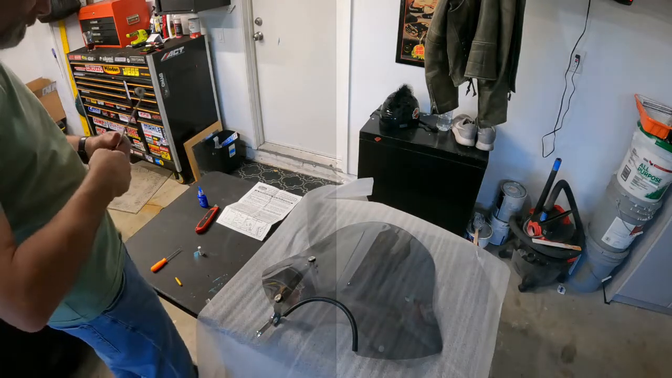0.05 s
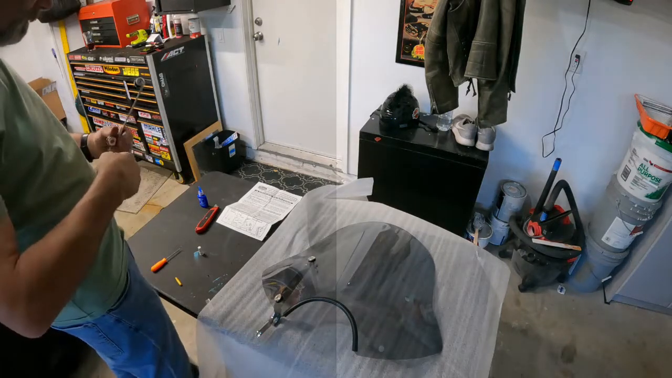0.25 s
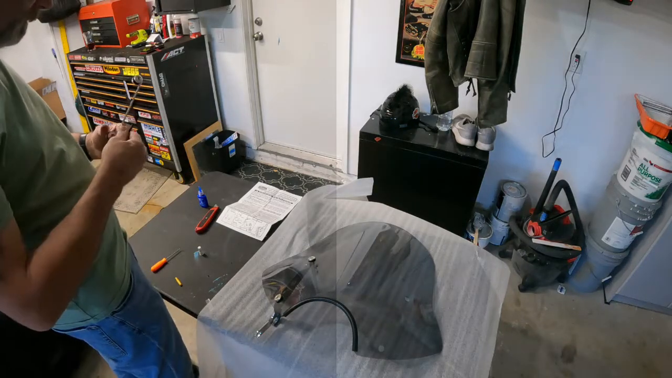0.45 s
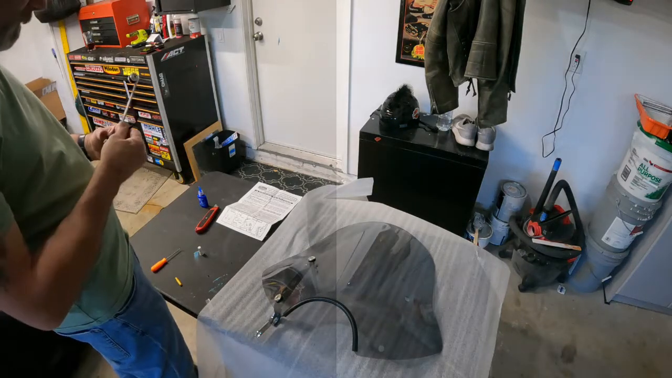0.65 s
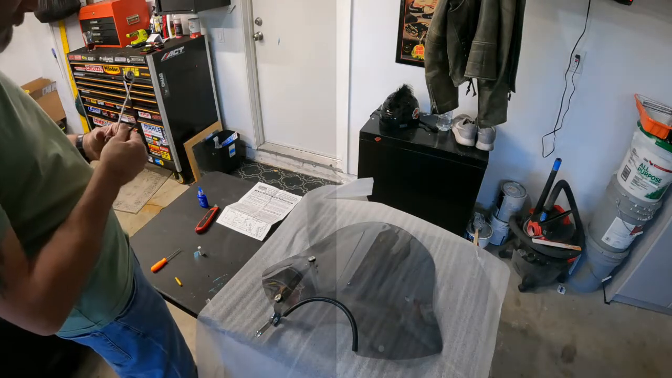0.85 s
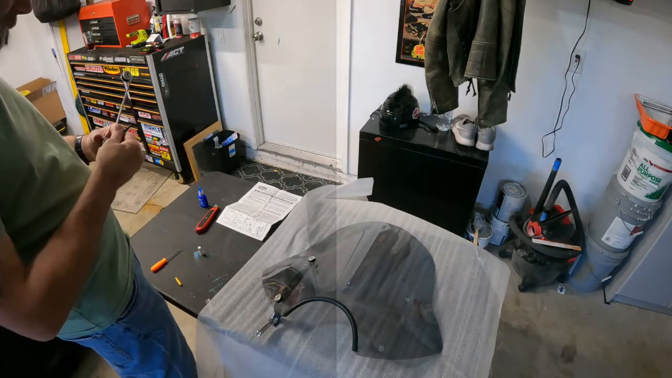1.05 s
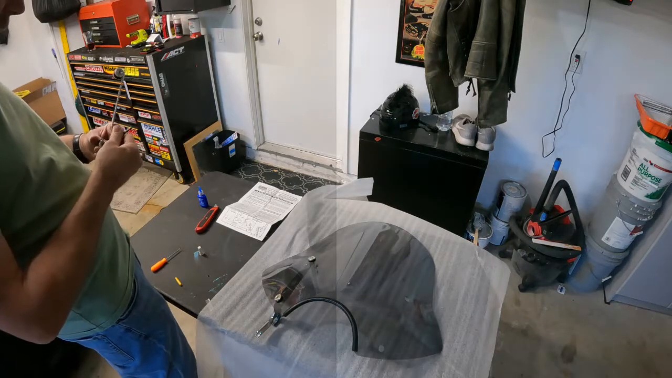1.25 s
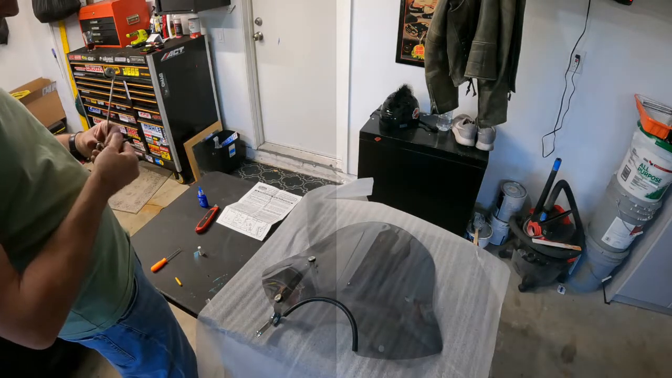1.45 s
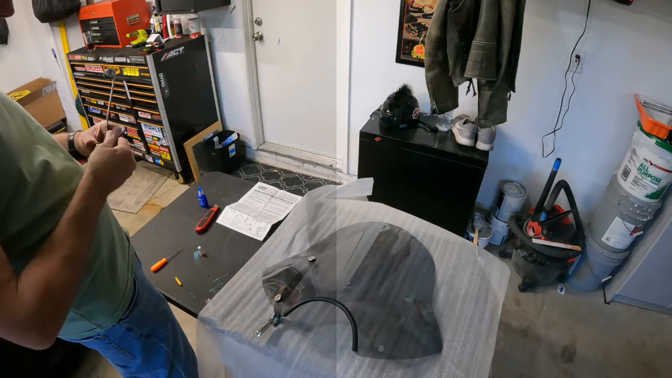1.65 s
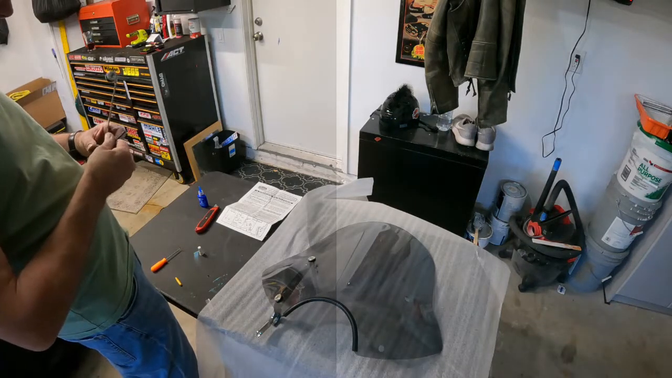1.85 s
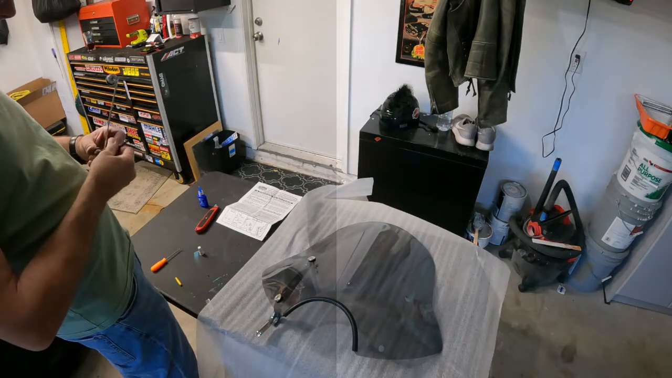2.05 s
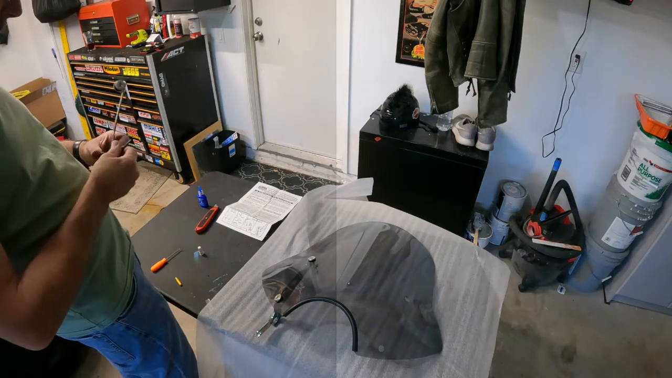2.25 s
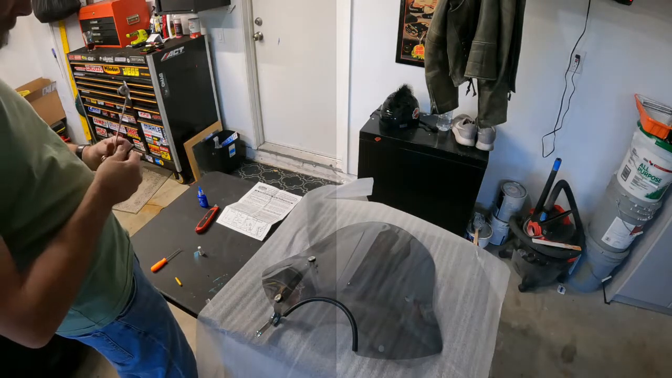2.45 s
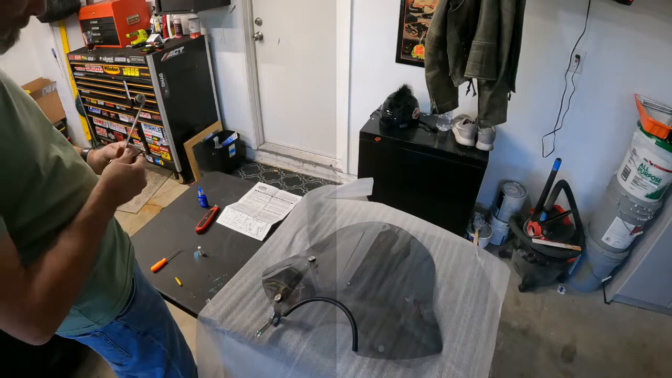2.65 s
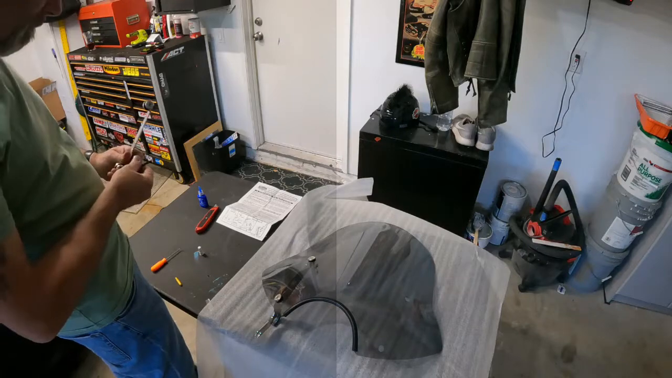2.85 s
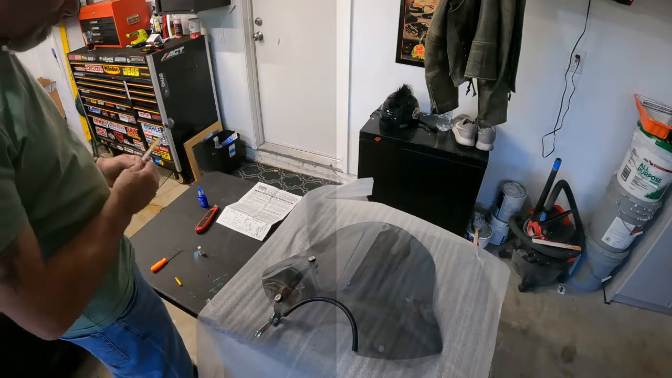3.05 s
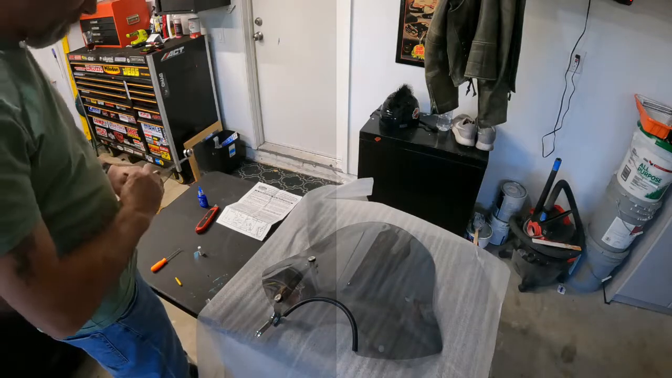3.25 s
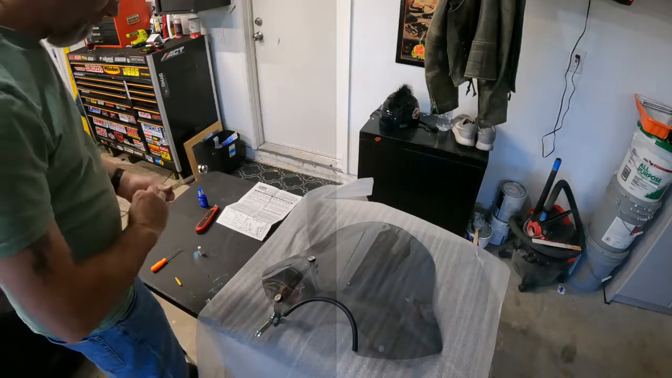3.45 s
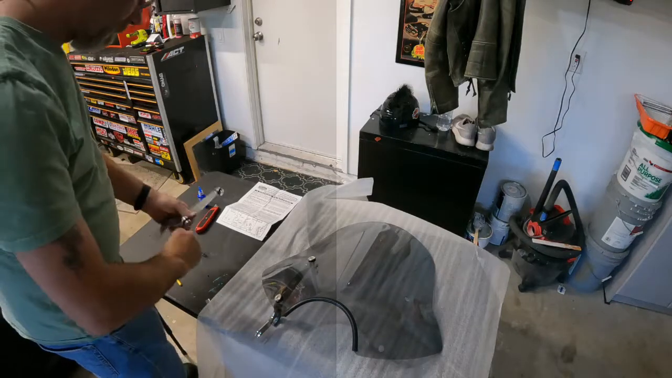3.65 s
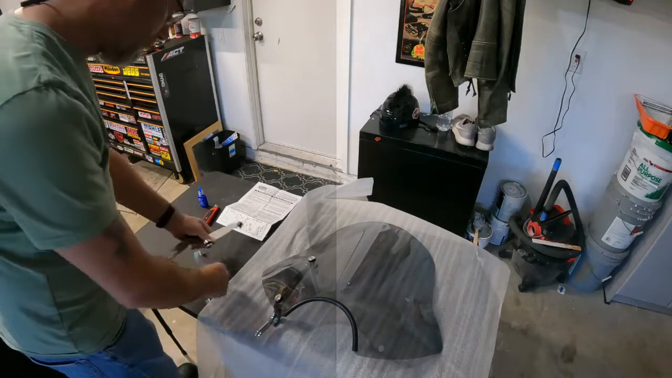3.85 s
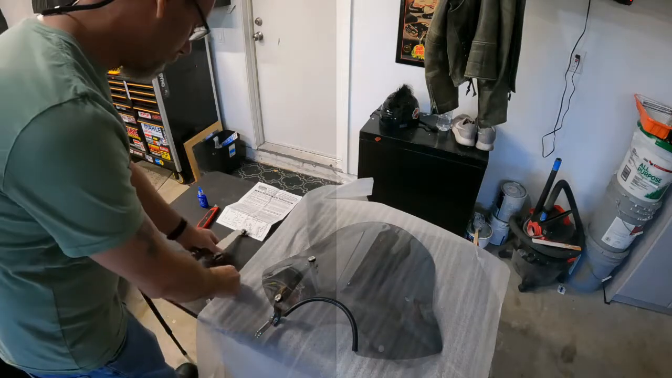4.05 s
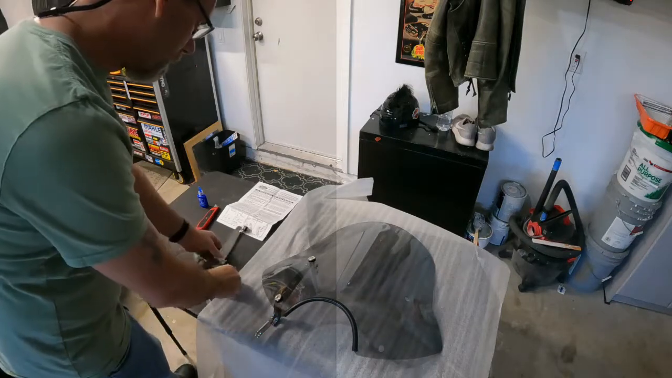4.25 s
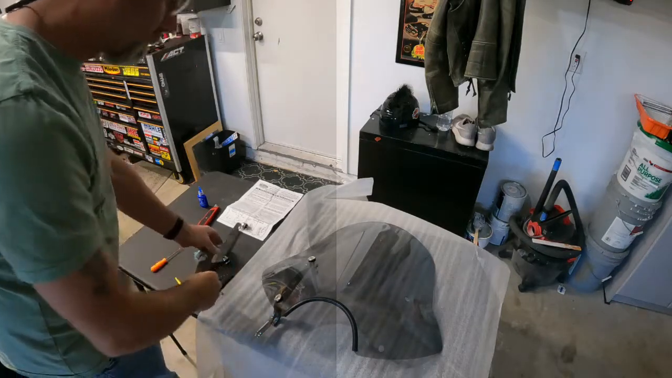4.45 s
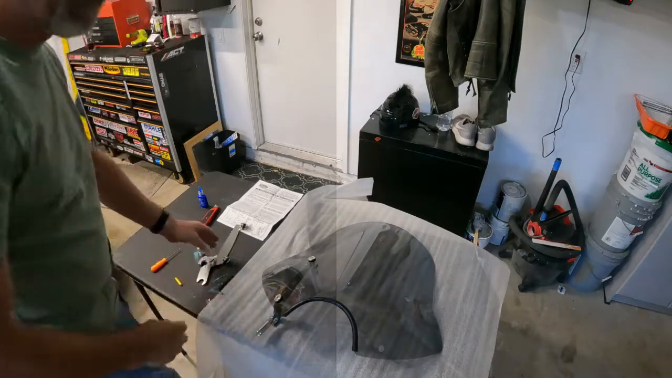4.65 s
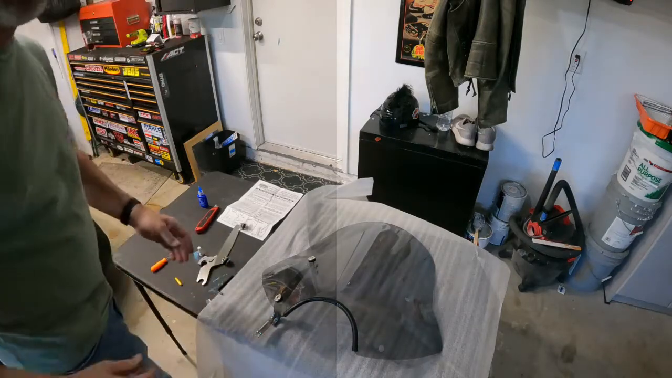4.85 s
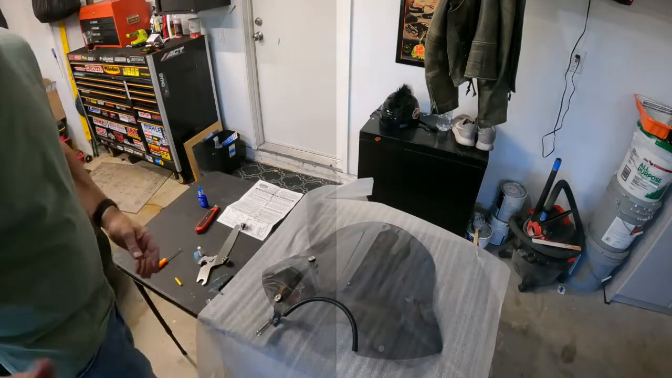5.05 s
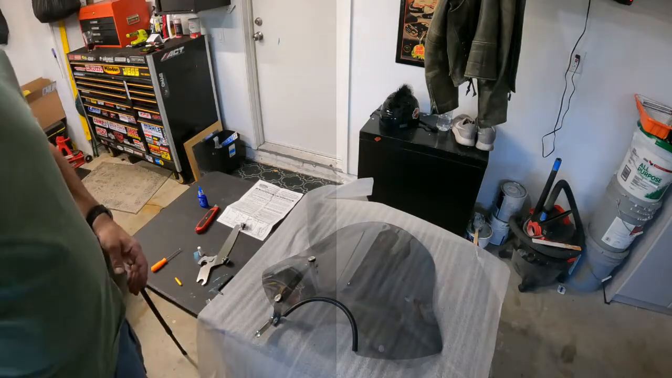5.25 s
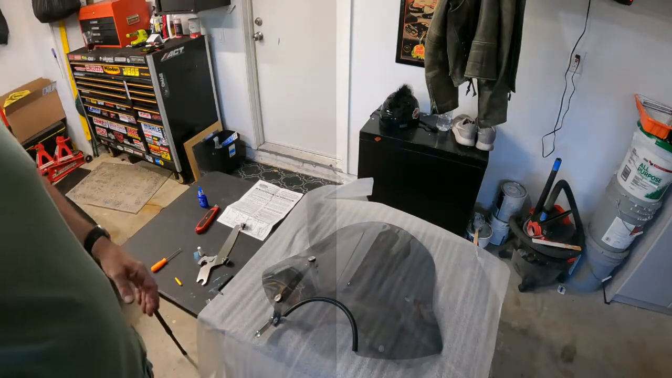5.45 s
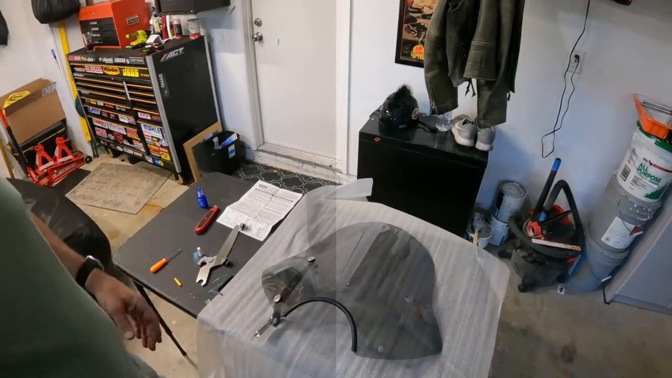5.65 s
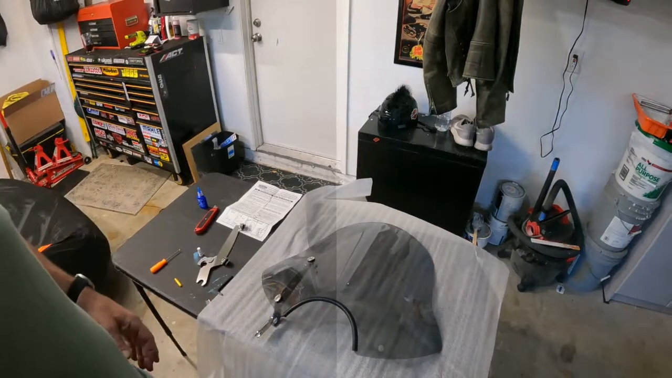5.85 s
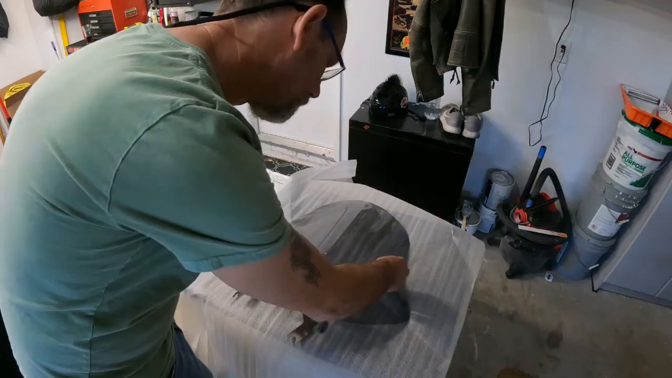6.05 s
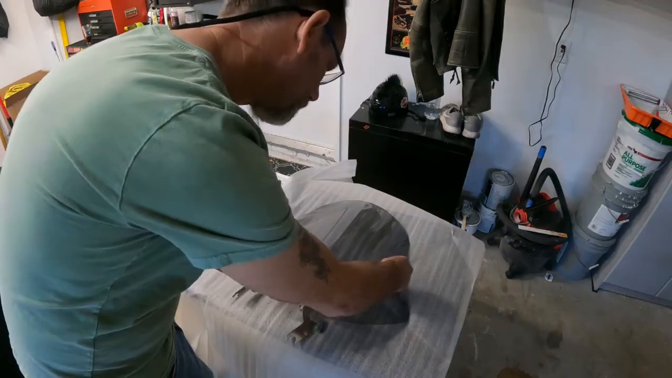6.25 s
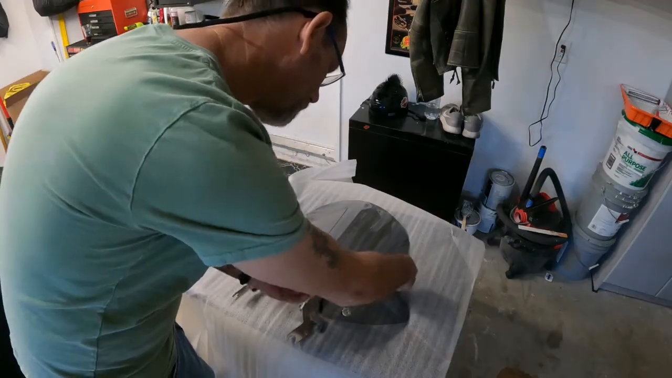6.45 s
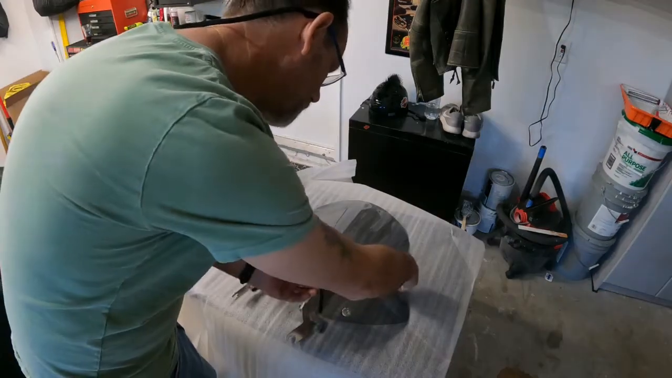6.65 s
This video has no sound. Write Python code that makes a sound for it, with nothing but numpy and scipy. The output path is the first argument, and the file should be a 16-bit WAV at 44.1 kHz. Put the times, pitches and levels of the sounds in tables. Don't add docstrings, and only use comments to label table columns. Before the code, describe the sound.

Quiet garage air, with hands working at arm's length from the microphone. Sleeves rub, tiny metal pieces tick and click sparsely, then more sharply. Around four seconds a steel wrench bounces and rattles on a hollow plastic tabletop, with boomy knocks and a short echo; a heavier part lands with a deep thud. Faint taps and cloth follow, then rough handling of the microphone, a tiny gap and calm room tone.

```python
import sys
import numpy as np
from scipy import signal
from scipy.io import wavfile
from scipy.ndimage import map_coordinates

SR = 44100
rng = np.random.default_rng(int(sys.argv[2]) if len(sys.argv) > 2 else 0)


def dump_mix(stems):
    frames = np.atleast_2d(stems).T
    limited = np.clip(frames, -1, 1)
    pcm = np.round(limited * 32767).astype(np.int16)
    wavfile.write(sys.argv[1], SR, pcm)


def gain_from_decibels(decibels):
    exponent = np.asarray(decibels, float) / 20
    return 10 ** exponent


N = 295469


def rms_one(x):
    return x / np.sqrt(np.mean(x ** 2) + 1e-20)


def in_time(rows, silent_db=-110):
    s, *columns = np.transpose(rows)
    t = np.arange(N) / SR
    return np.array([np.interp(t, s, c, left=silent_db, right=silent_db) for c in columns])


def at_hz(points, hz):
    table_hz, value = np.array(points).T
    return np.interp(np.log(hz), np.log(table_hz), value)


def cut(x, hz, kind, order=2):
    return signal.sosfilt(signal.butter(order, hz, kind, fs=SR, output="sos"), x + 1e-18)


def drift(rate):
    coarse = np.arange(0, N + 32, 32)
    slow = map_coordinates(rng.standard_normal(1500), [coarse * rate / SR], order=3)
    return np.interp(np.arange(N), coarse, slow)


def bands(size, gain, alike):
    out, edges = 0, 62.5 * 2 ** np.arange(0, 8.1, .5)
    white = rng.standard_normal((2, 2, size))
    for k, (low, high) in enumerate(zip(edges, edges[1:])):
        mid, side = cut(white[k % 2], [low, high], "band")
        hz = np.sqrt(low * high)
        c = np.clip(alike(hz), -1, 1)
        out = out + gain(hz) * (np.sqrt(1 + c) * mid + np.sqrt(1 - c) * side * [[1], [-1]])
    return out


def strike(modes, contact_s, spread_db, rough, detune=0.0054):
    hz, level_db, t60 = np.transpose(modes)[:, :, None]
    t = np.arange(min(SR // 3, 800 + int(t60.max() * SR))) / SR
    luck = rng.standard_normal((2, len(modes), 1))
    phase = 2 * np.pi * hz * (1 + detune * luck[1]) * t
    decay = gain_from_decibels(level_db + spread_db * luck[0] - 60 * t / t60)
    rings = np.sum(decay * np.sin(phase), axis=0)
    contact = (1 - rough + rough * rng.standard_normal(800)) * np.exp(-t[:800] / contact_s)
    out = signal.fftconvolve(rings, contact)[:len(t)]
    return np.pad(out / np.abs(out).max(), (0, SR // 3 - len(t)))


def add(track, s, sound):
    i = round(s * SR)
    track[..., i:i + sound.shape[-1]] += sound[..., :N - i]


def sides(lean_db):
    return gain_from_decibels(np.array([[.5], [-.5]]) * lean_db)


def swells(rows, rise_db_per_s, fall_db_per_s):
    t = np.arange(N) / SR
    levels = []
    for s, hold, level_db in rows:
        rise_db = rise_db_per_s * np.maximum(s - t, 0)
        fall_db = fall_db_per_s * np.maximum(t - s - hold, 0)
        levels.append(level_db - rise_db - fall_db)
    return np.array(levels)


# (frequency [Hz], level [dB per Hz])
AIR_SPECTRUM = [(35, -47), (60, -19.5), (123, -21.5), (162, 8), (224, -2), (251, -11), (381, -12),
                (551, -25.5), (1130, -20.5), (1830, -28), (2470, -33.5), (3750, -37), (7000, -35),
                (11400, -52), (15000, -64.5)]
# (time [s], level [dB])
AIR_LEVEL = [(0, -61), (.6, -64), (2, -62), (4, -62), (5.9, -65), (6.04, -66.5), (6.7, -63)]
# (frequency [Hz], left-right likeness [0-1])
AIR_ALIKE = [(60, 0.75), (180, 0.74), (550, 0.12), (1650, 0.15), (4970, 0.83), (15000, 0.76)]
# (frequency [Hz], left minus right [dB])
AIR_LEAN = [(60, -4), (180, -4), (550, -9), (1650, -0.5), (4970, 3), (15000, 2)]
# (start [s], end [s], frequency [Hz], level [dB])
FAR_DRONES = [
    (3.82, 4.17, 145, -60),
    (5.52, 5.72, 211, -60),
    (4.95, 5.2, 185, -62),
]


def room_tone():
    def flicker(hz):
        return gain_from_decibels(at_hz(AIR_SPECTRUM, hz) + 1.9 * drift(6.6)) * sides(at_hz(AIR_LEAN, hz))

    air = bands(N, flicker, lambda hz: at_hz(AIR_ALIKE, hz))
    air = air + 4.2 * cut(air, 140, "high", order=8)
    out = gain_from_decibels(in_time(AIR_LEVEL)[0]) * rms_one(air)
    t = np.arange(N) / SR
    for start, end, hz, level_db in FAR_DRONES:
        swell = np.clip(np.minimum(t - start, end - t) / 0.075, 0, 1)
        level = gain_from_decibels(level_db + 3 + 0.87 * drift(27))
        out += level * swell * np.sin(2 * np.pi * hz * t + .5 * drift(11))
    return out


# (frequency [Hz], level [dB per Hz])
CLOTH_SPECTRUM = [(200, -6), (370, -2), (700, -17.5), (1270, 3.5), (2400, -5), (4200, -3), (6500, -3),
                  (7800, -11.5), (8800, -18), (12000, -21), (15000, -30.5)]
# (start [s], hold [s], level [dB], brightness [dB])
STROKES = [(0.0, 0.048, -48.5, -1.5), (0.096, 0.036, -51, -3), (0.159, 0.048, -51.5, -2.5),
           (0.96, 0.024, -66.5, -15), (1.25, 0.12, -70.5, -2), (1.628, .03, -80.5, 6),
           (2.4, 0.036, -86.5, 5), (2.608, 0.029, -74.5, 5), (3.1, 0.093, -75, 10.5), (3.19, 0.046, -65, 2),
           (3.37, 0.46, -81, 7), (3.9, 0.52, -75, 3.5), (4.52, .04, -51.5, 1), (4.604, 0.043, -47.5, -9),
           (5.357, 0.17, -66, -1), (5.638, 0.078, -63.5, 2.5), (5.809, 0.056, -50, 8),
           (5.89, 0.067, -53, 5.5)]
# (start [s], end [s])
GAP = (6.0025, 6.0365)


def cloth():
    grain_db = 1.5 * np.minimum(rng.exponential(1, N // 40 + 1), 4)
    grain = gain_from_decibels(grain_db).repeat(40)[:N]
    rub = bands(N, lambda hz: gain_from_decibels(at_hz(CLOTH_SPECTRUM, hz)), lambda hz: .6) * grain
    strokes = np.array(STROKES)
    strokes_db = swells(strokes[:, :3], rise_db_per_s=183, fall_db_per_s=170)
    dark_db = strokes_db.max(axis=0)
    bright_db = (strokes_db + strokes[:, 3:]).max(axis=0)
    dark = rms_one(cut(rub, [130, 3000], "band", order=3))
    bright = rms_one(cut(rub, [3200, 7600], "band", order=3))
    hiss = rms_one(cut(cut(rub, 8500, "high"), 19000, "high", order=1))
    bright = bright + gain_from_decibels(-20.5) * hiss
    out = gain_from_decibels(dark_db) * dark * sides(1.2) + gain_from_decibels(bright_db) * bright * sides(4.5)
    return out * (np.arange(N) < GAP[0] * SR)


# (frequency [Hz], level [dB], t60 [s])
PART_MIDDLE = [(3300, -1.5, .004), (3800, 0, .005), (4600, -3, .003), (5500, -3.5, .004)]
# (frequency [Hz], level [dB], t60 [s])
PART_TOP = [(6200, -5, .003), (6800, 0, .006), (8000, -4, .003), (9200, -3, .006), (11300, -6, .004),
            (12500, -12, .003)]
# (time [s], peak [dB], main ring [Hz])
SETTLING = [
    (0.0274, -40, 1355),
    (0.1082, -35, 1704),
    (0.1745, -41.5, 1200),
    (0.2394, -44.5, 1840),
]
# (time [s], peak [dB], main ring [Hz], middle rings [dB], top rings [dB])
TURNING = [(0.8989, -36, 2460, -4.5, -9), (1.0316, -47.5, 1790, -6, -36), (1.1648, -53.5, 1800, -21, -27),
           (1.2121, -46.5, 1670, 1.5, -33), (1.295, -49.5, 1520, -1, -29), (1.3209, -48.5, 1700, 8.5, 2),
           (1.3339, -35, 2500, -14, 0.5), (1.6457, -51, 2470, -18, -15), (2.0038, -54.5, 3900, 1, 5.5),
           (2.1104, -61.5, 1330, 0, 12), (2.1331, -51.5, 1720, 4, -27), (2.574, -47, 2400, -4, -16),
           (2.604, -44, 2370, -1.5, 1), (2.8759, -65, 1310, 9.5, 12.5)]
# (time [s], peak [dB], main ring [Hz], middle rings [dB], top rings [dB])
PARTING = [
    (3.027, -52, 2240, -8, -22),
    (3.0513, -40.5, 2510, 0, -30),
    (3.1769, -35, 2610, -2, -7.5),
    (3.384, -39, 3100, 5.5, -2),
    (3.5506, -36, 2580, 0, -26),
    (3.5648, -32.5, 3450, -3.5, -11),
    (3.6194, -36, 2890, -2, -2),
    (3.8406, -31, 3040, 9.5, 9),
    (4.1324, -62, 1540, -12.5, 6),
    (5.7162, -49.5, 2710, 2.5, 2.5),
]
# (time [s], left minus right [dB])
HANDS_LEAN = [(0, -1.5), (1.3, 7), (3.1, 5.5), (5.7, 0.5)]


def parts():
    out = np.zeros((2, N))
    settling = [tuple(row) + (-2, -0.5) for row in SETTLING]
    for s, peak_db, hz, middle_db, top_db in settling + list(TURNING) + list(PARTING):
        ring = [(hz, 0, .016), (hz * 1.1, -3, .012), (hz * .7, -9, .016), (hz * .9, -4, .01)]
        main = cut(strike(ring, .00008, spread_db=1.5, rough=.5), [hz * .65, hz * 1.25], "band")
        middle = gain_from_decibels(middle_db) * strike(PART_MIDDLE, .00012, spread_db=1.5, rough=.9, detune=.03)
        top = gain_from_decibels(top_db) * strike(PART_TOP, .0001, spread_db=2, rough=.9, detune=.02)
        lean_db = np.interp(s, *np.transpose(HANDS_LEAN))
        click = gain_from_decibels(peak_db + 2.0) * (main + middle + top) * sides(lean_db)
        add(out, s, click)
        add(out, s + .006, gain_from_decibels(-15.5) * click)
    return cut(out, 1300, "high", order=4)


# (frequency [Hz], t60 [s])
GARAGE_T60 = [(100, 0.35), (250, 0.52), (1000, 0.5), (2500, 0.5), (5500, 0.45), (11000, 0.18)]
# (frequency [Hz], left-right likeness [0-1])
GARAGE_ALIKE = [(60, 1), (180, 1), (550, 0.94), (1650, 0.79), (4970, 0.7), (15000, 0.22)]


def garage(dry):
    t = np.arange(int(.7 * SR)) / SR

    def dying(hz):
        return gain_from_decibels(-60 * t / at_hz(GARAGE_T60, hz)) * min(1, hz / 400) ** 0.51

    echo = bands(len(t), dying, lambda hz: at_hz(GARAGE_ALIKE, hz))
    build_up = np.clip((t - .0005) / .001, 0, 1)
    early = 1 + 2.5 * np.exp(-t / .005)
    echo = echo * build_up * early
    echo = echo / np.sqrt(np.sum(echo ** 2) / 2)
    return signal.fftconvolve(dry.mean(axis=0)[None], echo)[:, :N]


# (frequency [Hz], level [dB], t60 [s])
RIBS = [(500, -4, .05), (545, -5, .04), (650, -4, .03), (720, -3, .04), (810, -4, .03), (890, -3, .03),
        (965, -2, .04), (1050, -3, .02), (1130, -2, .03), (1250, -2, .02), (1400, -5, .015)]
# (frequency [Hz], level [dB], t60 [s])
CRACK = [(2200, -4, .003), (2900, -3, .003), (3400, -4, .003), (4100, -3, .003), (4700, -2, .003),
         (5300, -3, .004)]
# (frequency [Hz], level [dB], t60 [s])
SPARKLE = [(6750, -4, .003), (7700, -2, .003), (9200, -9, .003), (11400, -8, .004), (12700, -12, .003)]


def blow(boom, boom_db, knock_db, crack_db, sparkle_db):
    low = gain_from_decibels(boom_db + 3) * strike(boom, .0005, spread_db=1.2, rough=.1)
    ribs = cut(strike(RIBS, .0004, spread_db=3.5, rough=0.9, detune=.03), 1600, "low")
    crack = gain_from_decibels(crack_db + 6.5) * strike(CRACK, 0.0015, spread_db=0.0, rough=1.0, detune=.05)
    sparkle = gain_from_decibels(sparkle_db + 7) * strike(SPARKLE, 0.0005, spread_db=2.6, rough=1.0, detune=.05)
    return low + gain_from_decibels(knock_db + 6.5) * ribs + crack + sparkle


# (frequency [Hz], level [dB], t60 [s])
SOFT_BOOM = [(165, 0, 0.052), (213, -3, 0.029), (297, 2, 0.039), (373.6, -8.5, .03)]
# (time [s], boom [dB], knock [dB], crack [dB], sparkle [dB])
TAPS = [
    (0.075, -33.5, -50, -57, -68),
    (5.031, -64, -74, -76, -62),
    (5.298, -59, -49.5, -78.5, -73),
    (5.336, -40.5, -53.5, -52.5, -51),
    (5.362, -44, -49, -54.5, -52.5),
    (5.539, -61, -58, -73, -64),
    (5.744, -53, -59.5, -47, -56),
]
# (frequency [Hz], level [dB], t60 [s])
WRENCH_BOOM = [(122.8, -0.5, .2), (145.8, 0, .15), (170, 1, 0.11), (176, -12.5, .08), (213, -3.5, .1),
               (288, 1, 0.041), (338, -5.5, 0.28), (373, -12, 0.082)]
# (frequency [Hz], level [dB], t60 [s])
STEEL = [(4480, -3, .05), (4560, 0, .06), (4760, -1.5, .04)]
# (time [s], boom [dB], knock [dB], crack [dB], sparkle [dB])
WRENCH = [
    (4.182, -12.5, -30.5, -43.5, -40.5),
    (4.195, -10.5, -36.5, -44, -49.5),
    (4.276, -13.5, -11.5, -26.5, -42),
    (4.282, -13, -15.5, -24.5, -45.5),
    (4.304, -20.5, -14.5, -39.5, -45),
    (4.331, -16, -16, -27, -43),
    (4.374, -13, -14, -25, -32.5),
    (4.38, -8.5, -24.5, -30.5, -35),
    (4.42, -18, -25.5, -39, -46),
    (4.454, -25.5, -29, -44.5, -55),
]
# (frequency [Hz], level [dB], t60 [s])
HEAVY_BOOM = [(126, 2, 0.14), (165, 5.5, 0.049), (226.5, -6.5, 0.079), (334, -7.5, 0.1), (378, -12, 0.096)]
# (time [s], boom [dB], knock [dB], crack [dB], sparkle [dB])
THUMPS = [
    (4.648, -18.5, -15, -24, -18),
    (4.651, -4.5, -16, -33, -22.5),
    (4.679, -11, -17.5, -31, -36),
    (4.716, -23, -24, -33.5, -47),
]


def table():
    out, t = np.zeros(N), np.arange(SR // 3) / SR
    for s, boom_db, knock_db, crack_db, sparkle_db in WRENCH:
        ring = strike(STEEL, 0.00034, spread_db=-0.5, rough=0.73, detune=.015)
        rattle = cut(rng.standard_normal(len(t)), [1500, 5500], "band", order=1)
        steel = gain_from_decibels(crack_db - 1) * ring
        buzz = gain_from_decibels(crack_db - 23.5) * np.exp(-t / 0.076) * rattle
        add(out, s, blow(WRENCH_BOOM, boom_db, knock_db, crack_db, sparkle_db) + steel + buzz)
    for boom, rows in ((HEAVY_BOOM, THUMPS), (SOFT_BOOM, TAPS)):
        for s, *levels in rows:
            add(out, s, blow(boom, *levels))
    return cut(out, 1800, "low") * sides(.6) - cut(out, 2000, "high") * sides(2.5)


# (start [s], hold [s], level [dB])
PUFFS = [(.12, 0.013, -66), (.3, 0.23, -59.5), (1.29, 0.018, -62), (1.43, 0.17, -61.5), (1.7, .12, -63.5),
         (2.05, 0.13, -63), (2.36, 0.018, -65), (2.6, .25, -65), (3.55, .2, -67.5), (3.97, .03, -66),
         (4.22, 0.24, -49.5), (4.67, 0.16, -47.5)]
# (time [s], level [dB])
TOUCH = [
    (5.72, -55),
    (5.76, -60),
    (5.82, -36.5),
    (5.87, -48.5),
    (5.95, -47.5),
    (5.985, -29),
    (6.0, -48),
]
# (time [s], peak [dB], frequency [Hz], left minus right [dB])
SNAPS = [
    (5.968, -23.5, 540, -16),
    (5.9818, -10, 4120, 20),
    (5.9825, -10, 3656, -5),
]


def ports():
    shared, *own = rng.standard_normal((3, N))
    own = np.array(own)
    stir = rms_one(cut(cut(shared + 0.5 * own, 55, "low", order=6), 5.4, "high"))
    drag = rms_one(cut(cut(own, 110, "low", order=1), 260, "low"))
    puffs_db = swells(PUFFS, rise_db_per_s=158.5, fall_db_per_s=220).max(axis=0)
    stir_db = np.maximum(puffs_db, -71)
    out = gain_from_decibels(stir_db) * stir + gain_from_decibels(in_time(TOUCH)) * drag

    near_db = swells([(5.82, .14, -21)], rise_db_per_s=256, fall_db_per_s=1500)[0]
    wobbles_per_s, press_s, press_width_s = 70, 5.982, .011
    wobble = np.tanh(1.3 * drift(wobbles_per_s) + .7 * drift(2.4 * wobbles_per_s))
    press = gain_from_decibels(-15) * np.exp(-((np.arange(N) / SR - press_s) / press_width_s) ** 4)
    out += (gain_from_decibels(near_db) * wobble + press) * [[1], [.1]]

    for s, peak_db, hz, lean_db in SNAPS:
        case = [(hz * .33, -8, .014), (hz * .5, -5, .004), (hz * .75, -3, .004),
                (hz, 0, .005), (hz * 1.4, -6, .003), (hz * 1.85, -3, .003)]
        snap = strike(case, .00006, spread_db=.5, rough=.6)
        snap = cut(snap, [hz * .3, hz * 2.2], "band", order=3)
        add(out, s, gain_from_decibels(peak_db) * snap * sides(lean_db))
    return out


def scene():
    hands, top = parts(), table()
    wet = garage(gain_from_decibels(2.0) * hands + gain_from_decibels(1.5) * top)
    heard = cut(hands + top + wet, 119, "high", order=8)
    thud = cut(cut(top, 85, "low", order=5), 55, "high", order=3)
    heard = cut(heard + gain_from_decibels(-14.5) * thud, 12800, "low", order=4)
    before_change = np.arange(N) < GAP[1] * SR
    return heard * before_change + cloth() + ports() + room_tone()


def low_pass(x):
    return signal.sosfilt(signal.butter(12, 15880, fs=SR, output="sos"), x)


def record(dry):
    t = np.arange(N) / SR
    fade_out, fade_in = (GAP[0] - t) / .003, (t - GAP[1]) / .002
    kept = np.clip(np.maximum(fade_out, fade_in), .0002, 1)
    rounded = .95 * np.tanh(dry * kept / .95)
    mix = cut(rounded, 15000, "low", order=12)
    return low_pass(mix)


dry = scene()
out = record(dry)
dump_mix(out)
```